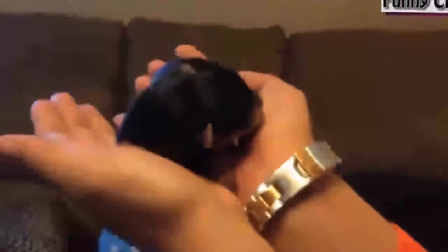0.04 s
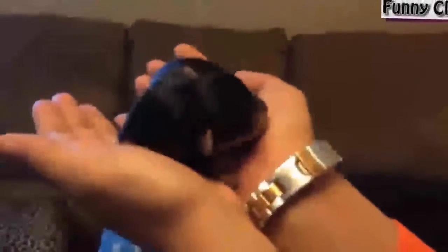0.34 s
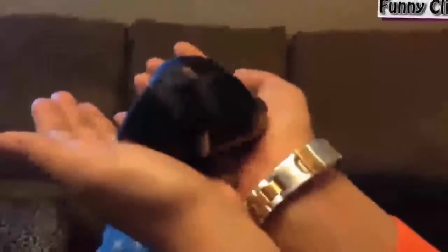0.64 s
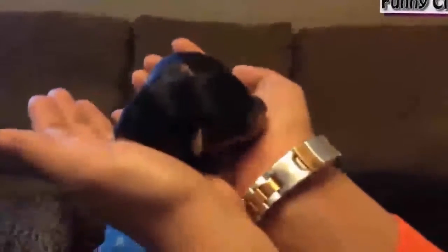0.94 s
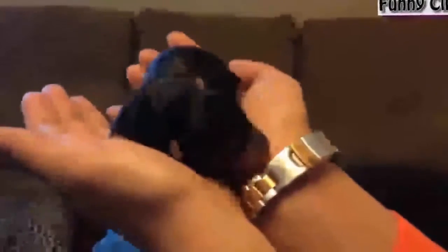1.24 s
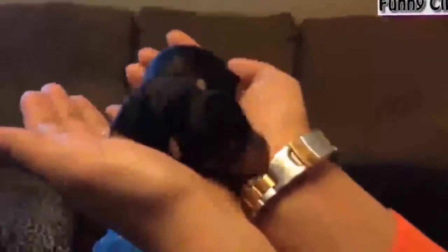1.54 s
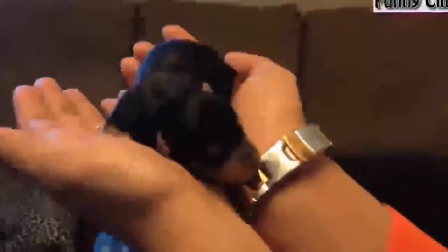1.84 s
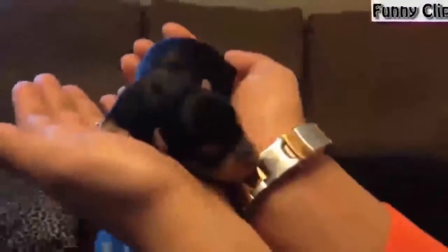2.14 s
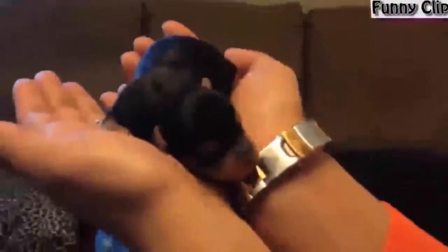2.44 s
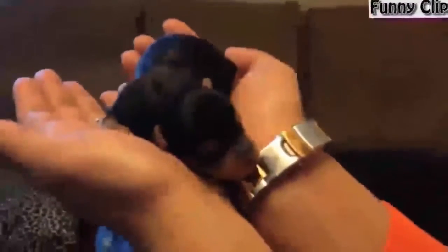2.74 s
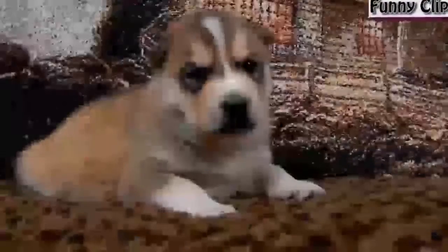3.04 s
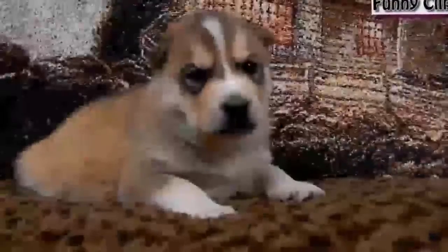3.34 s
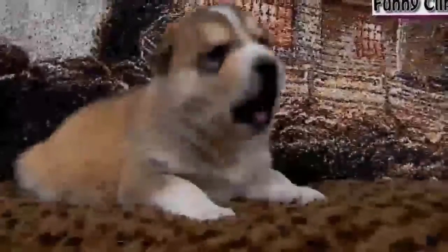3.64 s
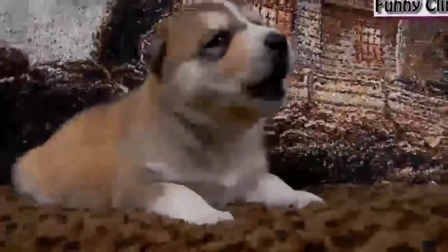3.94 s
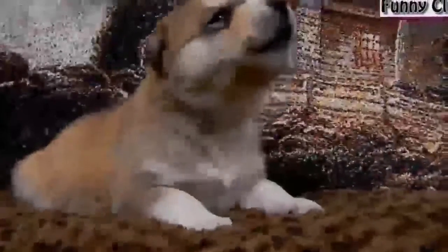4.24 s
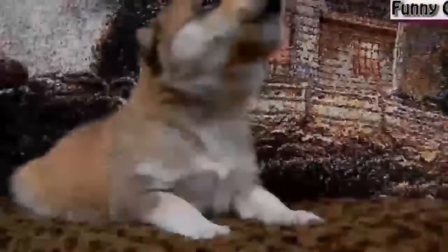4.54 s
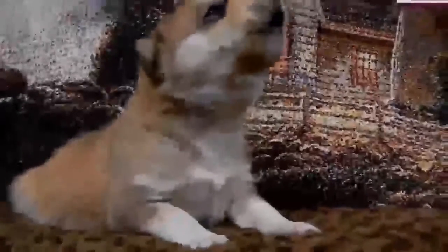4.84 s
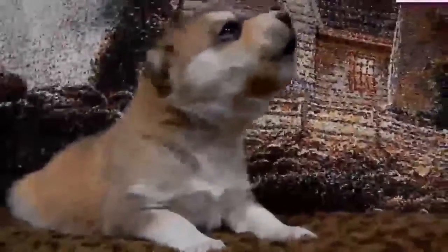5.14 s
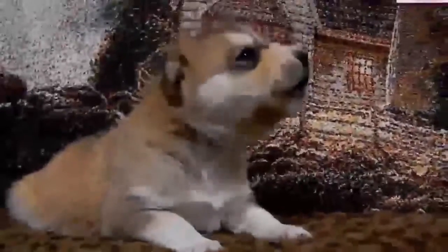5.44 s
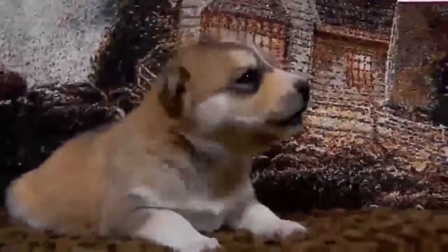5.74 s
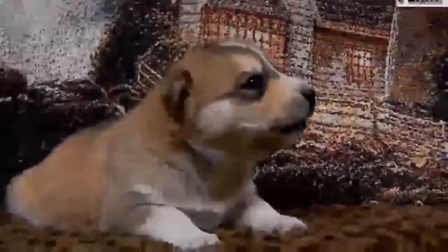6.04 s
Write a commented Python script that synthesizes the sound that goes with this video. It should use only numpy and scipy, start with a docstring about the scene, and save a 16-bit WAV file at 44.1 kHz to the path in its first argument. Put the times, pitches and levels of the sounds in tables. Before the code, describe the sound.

A newborn puppy whimpers twice, then an older pup yelps, gasps and gives a long trembling, falling howl over room hum.

```python
"""Soft hiss, and over it a newborn puppy, held in the hands, whimpers twice. After a moment of silence
an older pup, close by in a second, humming room, yelps, gasps with a rattle, holds a long trembling
howl that sinks away, and starts a lower moan. Each cry follows the source-filter principle: vibrating
vocal folds supply harmonics and breath noise, and the resonances of throat and mouth shape them.
Walls add reverberation, fans and motors hum, and a hand softly bumps the microphone."""
import sys
import numpy as np
from scipy import signal
from scipy.fft import rfft, irfft
from scipy.io import wavfile
from scipy.ndimage import uniform_filter1d

SR = 44100
rng = np.random.default_rng(int(sys.argv[2]) if len(sys.argv) > 2 else 0)


def pcm_store(signal):
    """Save signal as 16-bit PCM."""
    levels = np.round(np.clip(np.atleast_2d(signal), -1, 1) * 32767)
    wavfile.write(sys.argv[1], SR, levels.astype(np.int16).T)


N = 277389
TIME = np.arange(N) / SR
BINS = np.fft.rfftfreq(N, 1 / SR)

# Vocal tract response with the head lowered and the mouth nearly shut.
# Each row: frequency in Hz, relative gain in dB.
CLOSED_THROAT = [(500, 6), (1250, 38.5), (2050, 27), (2650, 12.5), (3000, 29), (3400, 16.5), (3700, -13),
                 (4200, 9.5), (5700, 1), (6300, 7.5), (9000, -3), (15500, -24)]


def older_pup():
    """Posture sets the tract's resonances: muzzle raised for yelp and howl, head lowered for the moan."""
    # Each row: time in seconds, pitch in Hz, relative level in dB, relative treble level in dB.
    yelp = [(3.72, 1246, -34, -37), (3.73, 1161, -27, -36.5), (3.772, 1397, -13.5, -16.5),
            (3.804, 1413, -16.5, -16), (3.82, 1443, -13.5, -10.5), (3.828, 1502, -8, -20),
            (3.852, 1454, -15.5, -15), (3.876, 1304, -18.5, -42), (3.904, 1235, -26, -44),
            (3.91, 1180, -31, -40)]
    howl = [(4.1, 918, -31, -46.5), (4.144, 1155, -23, -29), (4.174, 1230, -26.5, -35.5),
            (4.294, 1026, -17.5, -44.5), (4.476, 1075, -19.5, -38.5), (4.572, 1058, -16.5, -38),
            (4.71, 963.7, -20, -40.5), (4.906, 897.4, -22, -46), (5.322, 835, -25.5, -46),
            (5.414, 801.4, -26.5, -47.5), (5.468, 730.3, -27, -53.5), (5.542, 560.6, -26.5, -52),
            (5.61, 487, -28.5, -53), (5.69, 331, -25.5, -59)]
    # Each row: time in seconds, pitch in Hz, relative level in dB.
    moan = [(5.82, 191, -46), (5.872, 284.2, -27.5), (5.908, 396.7, -21), (5.93, 464.5, -23),
            (5.956, 666.6, -19), (5.984, 670.3, -18.5), (6.172, 487, -23.5), (6.206, 473.6, -24.5),
            (6.29, 374.3, -22)]
    # Resonances of the mouth and the open throat. Each row: frequency in Hz, relative gain in dB.
    yelp_mouth = [(1170, -11), (1400, 5.5), (2450, -11.5), (2800, -11), (3000, -8), (3500, -30),
                  (3950, -30), (4200, -11), (4500, -11.5)]
    howl_mouth = [(350, -4), (700, -9.5), (850, -5.5), (960, -4.5), (1060, -1), (1200, -7), (1550, -10.5),
                  (2150, -18.5), (2450, -6.5), (2600, -5.5), (2860, 9), (3150, -10), (3700, 7.5)]
    moan_mouth = [(330, -2), (600, -4), (680, -3.5), (900, 0), (1120, -2), (1340, -0.5), (1550, -14),
                  (2000, -23)]
    open_throat = [(500, -4), (1250, 32), (1750, 27.5), (2300, 14.5), (2950, 25.5), (3700, -6.5),
                   (4300, -2.5), (5000, 4.5), (5600, 11), (6500, 7.5), (7300, -5), (8000, -3.5),
                   (9800, -14), (11000, -11.5), (15500, -34)]
    # Direction cues. Each row: frequency in Hz, left minus right level in dB, left lead in radians.
    direction = [(400, -3.5, 1.16), (920, -4, 1.21), (1400, -2.5, 1.05), (2000, -1, 1.02), (2900, 1, 1.16),
                 (4170, 6, 0.69), (5500, 3.5, -0.96), (8000, 1.5, -0.091)]
    dry = cry(yelp, yelp_mouth, open_throat, direction, gain_db=0.5, treble_db=-2, breath_db=-18.5,
              tremor_hz=28.2, tremor_depth=0.00063, tired_db=-1,
              jitter=0.005, shimmer=0.083, fray=0.061, edge_s=0.0024)
    dry += cry(howl, howl_mouth, open_throat, direction, gain_db=2.67, treble_db=-3, breath_db=-20,
               tremor_hz=27.82, tremor_depth=0.026, tired_db=11.5,
               jitter=0.00754, shimmer=0.049, fray=0.027, edge_s=0.0054, third_db_per_khz=-38.5)
    dry += cry(moan, moan_mouth, CLOSED_THROAT, direction, gain_db=0.5, treble_db=-32, breath_db=-10,
               tremor_hz=25.9, tremor_depth=0.021, tired_db=12.5,
               jitter=0.0103, shimmer=0.073, fray=0.067, edge_s=0.0045)
    dry += gasp()
    return dry + reverberation(dry, t60=0.38, wet_db=-7, damp_hz=7440)


def newborn():
    """Two thin cries end in glottal closure; absorption by a sofa keeps the reverberation short."""
    # Each row: time in seconds, pitch in Hz, relative level in dB.
    whimper = [(1.02, 1052, -41), (1.038, 1076, -30.5), (1.07, 1068, -30), (1.102, 948, -31.5),
               (1.114, 942, -27.5), (1.18, 830.8, -36.5), (1.27, 766, -33.5), (1.3, 795, -31),
               (1.32, 713, -40.5)]
    squeak = [(2.72, 1080, -30.5), (2.73, 930.5, -20.5), (2.756, 932, -19.5), (2.792, 902, -19.5),
              (2.8, 881, -21.5), (2.816, 693, -28.5), (2.84, 702, -25.5), (2.866, 856, -23),
              (2.885, 880, -22)]
    # The glottis snaps shut. Each row: start in seconds, initial level in dB.
    catches = [(1.315, -63), (2.88, -29), (2.925, -36)]
    # Mouth resonances and the spectrum of a catch. Each row: frequency in Hz, relative gain in dB.
    mouth = [(700, -6.5), (770, -3.5), (830, -3.5), (930, 5.5), (1060, 2), (1400, 5.5), (1550, -5),
             (1700, -8.5), (1860, -10.5), (2090, -4.5), (2300, -33), (2800, -45)]
    catch_spectrum = [(300, 2), (650, 12.5), (1300, 14.5), (2000, 1), (3300, -11), (6000, -37)]
    ahead = [(1, 0.0064, 0)]  # left and right nearly equal and in phase at every frequency
    dry = cry(whimper, mouth, CLOSED_THROAT, ahead, gain_db=0, treble_db=-59, breath_db=-6,
              tremor_hz=38.2, tremor_depth=0.006, tired_db=2.5,
              jitter=0.007, shimmer=0.088, fray=0.087, edge_s=0.0026, second_db=3.5)
    dry += cry(squeak, mouth, CLOSED_THROAT, ahead, gain_db=0.5, treble_db=-49, breath_db=-7.5,
               tremor_hz=40, tremor_depth=0.0019, tired_db=3,
               jitter=0.0055, shimmer=0.031, fray=0.03, edge_s=0.0017, second_db=-5)
    dry += sum(undb(db) * puff(start, catch_spectrum, decay_s=0.022) for start, db in catches)
    return dry + reverberation(dry, t60=0.084, wet_db=-4.5, damp_hz=4020)[0]


def cry(contour, mouth, throat, direction, gain_db, treble_db, breath_db, tremor_hz, tremor_depth,
        tired_db, jitter, shimmer, fray, edge_s, second_db=0, third_db_per_khz=0):
    """Source and filter: the mouth shapes the folds' three lowest harmonics, the throat all the rest."""
    on = (TIME >= contour[0][0]) & (TIME <= contour[-1][0])
    t = TIME[on]
    note, *levels = curves(contour, t)
    level_db = levels[0]
    ring_db = levels[-1] + treble_db  # without a curve of its own the treble follows the level
    tremor, rasp_db = larynx(on, tremor_hz, tremor_depth, tired_db)
    pitch = note * (1 + tremor + jitter * undb(rasp_db / 2) * waver(174)[on])
    # Each cycle closes a little early or late, which frays the high harmonics most.
    phase = 2 * np.pi * np.cumsum(pitch) / SR + fray * undb(rasp_db) * waver(490)[on]
    harmonic = np.arange(1, 31)[:, None]
    hz = harmonic * pitch

    amplitude = undb(ring_db) * throat_gains(harmonic, hz, throat)
    amplitude *= 1 + 12 * tremor  # the ring flutters with the pitch
    flutter_share = 0.46  # part of the quaver that the mouth turns into loudness
    fluttering = mouth_gains(note + flutter_share * (pitch - note), mouth, second_db, third_db_per_khz)
    steady = mouth_gains(note, mouth, second_db, third_db_per_khz)
    amplitude[:3] = undb(level_db) * fluttering / np.linalg.norm(steady, axis=0)

    pan_db, lead = at_frequency(direction, hz), at_frequency(direction, hz, column=2)
    folds = np.array([np.sum(amplitude * undb(side * pan_db) * np.sin(harmonic * phase + side * lead), 0)
                      for side in (0.5, -0.5)])
    # Rasp makes the cycles uneven, then alternately strong and weak, and lets more air through.
    folds *= 1 + shimmer * undb(rasp_db) * waver(200)[on]
    subharmonic_depth = np.minimum(0.45 * shimmer * undb(2 * rasp_db), 0.5)
    folds *= 1 + subharmonic_depth * np.cos(phase / 2 + waver(90)[on])
    airflow = undb(breath_db + rasp_db) * np.sqrt(undb(ring_db) * np.linalg.norm(amplitude, axis=0))
    voice = np.sqrt(2) * folds + airflow * aspiration(on, phase, throat)
    out = np.zeros((2, N))
    out[:, on] = voice * undb(gain_db) * gate(t, t[0], t[-1], edge_s)
    return out


def larynx(on, tremor_hz, tremor_depth, tired_db):
    """Tremor modulates the pitch, most in mid-cry; the folds rasp at a crack and as the air runs out."""
    # Cracks of the voice. Each row: centre in seconds, half-width in seconds, extra rasp in dB.
    cracks = [(1.11, 0.053, 4.5), (3.724, 0.019, 12), (3.81, 0.0081, 6.5), (4.142, 0.052, 13.5)]
    fresh_rasp_db, slowing_hz_per_s = -2.5, 3.41
    t = TIME[on]
    age = t - t[0]
    progress = age / age[-1]
    rasp_db = fresh_rasp_db + tired_db * progress ** 2.4  # the folds tire late in the cry
    rasp_db += sum(db * np.exp(-((t - centre) / width) ** 2) for centre, width, db in cracks)
    rate_hz = tremor_hz - slowing_hz_per_s * age
    depth = tremor_depth * np.abs(np.sin(np.pi * progress)) ** 0.42  # sets in early and lasts
    depth *= 1 + 0.25 * waver(12)[on]  # no two quavers are equally deep or equally long
    phase = 2 * np.pi * np.cumsum(rate_hz) / SR + 0.4 * waver(10)[on]
    return depth * np.cos(phase), rasp_db


def mouth_gains(pitch, mouth, second_db, third_db_per_khz):
    """Mouth resonances weight the three lowest harmonics; the third can fade as the folds tighten."""
    slack_hz = 408  # below this pitch the third harmonic is at full strength
    tightness_khz = np.maximum(pitch - slack_hz, 0) / 1000
    source_db = [0, second_db, third_db_per_khz * tightness_khz]
    return np.array([undb(db + at_frequency(mouth, k * pitch)) for k, db in enumerate(source_db, 1)])


def throat_gains(harmonic, hz, throat):
    """Harmonics swell as they sweep across a resonance; the treble's short-term power is held near 1."""
    below_nyquist = np.clip((SR * 0.4 - hz) / 1000, 0, 1)
    gains = undb(at_frequency(throat, hz)) * below_nyquist
    treble_weight = np.clip((hz - 3500) / 600, 0, 1) * (harmonic > 3)
    treble_power = np.sum((gains * treble_weight) ** 2, axis=0)
    return gains / np.sqrt(uniform_filter1d(treble_power, SR // 30))


def aspiration(on, phase, throat):
    """Turbulence: air leaks through the folds once a cycle, as bright noise filtered by the throat."""
    bright_tilt = BINS ** 2 / (BINS ** 2 + 900 ** 2) * (1 + BINS / 7000)
    hiss = unit(noise(undb(at_frequency(throat, BINS)) * bright_tilt))
    return hiss[on] * (1 + np.cos(phase))


def gasp():
    """Impulse excitation: a gulp of air slaps the throat, and each slap rings the damped chest."""
    # Each row: start in seconds, relative slap level in dB, relative chest level in dB.
    slaps = [(3.981, -9.5, -25), (3.992, -15, -22), (4, -8, -24), (4.008, -6, -39), (4.02, -6.5, -22),
             (4.024, -41, -27)]
    # Spectrum of a slap. Each row: frequency in Hz, relative gain in dB.
    slap_spectrum = [(240, -26), (400, -9), (630, -9.5), (712, -9.5), (1230, 2.5), (3100, -16),
                     (3610, -4.5), (4530, -41), (6320, -25), (8180, -26), (12300, -29.5), (14300, -50),
                     (15000, -36)]
    chest_hz, chest_decay_s = 190, 0.0026
    out = np.zeros(N)
    for start, slap_db, chest_db in slaps:
        age = np.maximum(TIME - start, 0)
        out += undb(slap_db - 8) * puff(start, slap_spectrum, decay_s=0.004)
        out += undb(chest_db + 9.5) * np.sin(2 * np.pi * chest_hz * age) * np.exp(-age / chest_decay_s)
    return out


def puff(start, spectrum, decay_s):
    """A sudden burst of air through the throat gives filtered noise with an exponential decay."""
    age = np.maximum(TIME - start, 0)
    return unit(noise(undb(at_frequency(spectrum, BINS)))) * np.exp(-age / decay_s) * (age > 0)


def reverberation(x, t60, wet_db, damp_hz):
    """Diffuse reflections in a small furnished room decay exponentially, duller than their source."""
    t = TIME[:SR // 2]
    tail = rng.standard_normal(len(t)) + 0.5 * rng.standard_normal((2, len(t)))  # sides much alike
    tail *= undb(-60 * t / t60) * (t > 0.0015)
    tail /= np.sqrt(np.sum(tail ** 2, axis=1, keepdims=True))
    tail = signal.sosfilt(signal.butter(1, damp_hz, fs=SR, output="sos"), tail)
    return undb(wet_db) * signal.fftconvolve(x, tail, axes=1)[:, :N]


def room_air():
    """Ambient noise: each room in turn has its own spectrum and its own left-right correlation."""
    # Each row: frequency in Hz, relative spectral density in dB.
    first_spectrum = [(12, -12), (20, 4), (59, -6), (133, -8.5), (181, -11.5), (215, -11), (345, -14),
                      (693, -17), (819, -17.5), (1180, -20), (1430, -21), (11000, -35), (14500, -34),
                      (15800, -36.5)]
    second_spectrum = [(12, -69), (20, -38), (37, -10.5), (123, -1), (240, -6), (335, -9), (375, -5.5),
                       (843, -26), (1050, -22.5), (1650, -27.5), (2370, -31), (2650, -32), (6470, -39.5),
                       (10700, -41), (15800, -47.5)]
    # Each row: frequency in Hz, correlation between left and right.
    first_coherence = [(60, 0.64), (120, 0.37), (400, 0.62), (2400, 0.74), (4400, 0.36), (15000, .05)]
    second_coherence = [(60, 0.85), (130, 1), (290, 0.71), (640, -0.86), (1410, -0.77), (3100, -0.67),
                        (6820, -0.33), (15000, 0.54)]
    first_end_s, second_start_s = 3.118, 3.176
    first = stereo_noise(first_spectrum, first_coherence, level_db=-43.5, flicker_db=1.05)
    second = stereo_noise(second_spectrum, second_coherence, level_db=-36.5, flicker_db=-0.53)
    return first * gate(TIME, -1, first_end_s, 0.0089) + second * gate(TIME, second_start_s, 10, 0.002)


def stereo_noise(spectrum, coherence, level_db, flicker_db):
    """Partial coherence: one noise is shared by both sides, another enters them in opposite phase."""
    gain = undb(at_frequency(spectrum, BINS))
    correlation = np.clip(at_frequency(coherence, BINS), -0.9, 0.97)
    mid = noise(gain)
    side = noise(gain * np.sqrt((1 - correlation) / (1 + correlation)))
    return np.array([mid + side, mid - side]) / np.std(mid) * undb(level_db + flicker_db * waver(6))


def motor_hum():
    """Rotating fans and motors radiate low tones that wander slightly in frequency."""
    # Each row: start in seconds, end in seconds, frequency in Hz, rms level in dB.
    tones = [(0, 1.05, 134.7, -49.5), (0, 3.12, 107.7, -54.5), (3.17, 6.3, 120, -42.5),
             (3.171, 5.4, 177, -46), (3.172, 6.3, 233, -52), (3.17, 6.3, 371, -48)]
    wander_hz = 2.462
    out = np.zeros(N)
    for start, end, hz, db in tones:
        phase = 2 * np.pi * np.cumsum(hz + wander_hz * waver(5.05)) / SR
        out += np.sqrt(2) * undb(db) * np.sin(phase) * gate(TIME, start, end, 0.022)
    return out


def hand_bumps():
    """Structure-borne sound: each touch of the hand gives the microphone one slow swing."""
    # Each row: centre in seconds, envelope peak in dB.
    bumps = [(0.311, -25), (.41, -24), (2.111, -25.5), (2.2, -25)]
    swing_hz, half_width_s = 16.7, 0.029
    out = np.zeros(N)
    for centre, db in bumps:
        t = TIME - centre
        out += undb(db) * np.exp(-(t / half_width_s) ** 2) * np.sin(2 * np.pi * swing_hz * t)
    return out


def undb(db):
    """Decibels to amplitude ratio."""
    return 10 ** (np.asarray(db) / 20)


def unit(x):
    """Normalisation to rms 1."""
    return x / np.sqrt(np.mean(x ** 2))


def curves(rows, t):
    """Linear interpolation in time of a table's columns."""
    times, *columns = np.transpose(rows)
    return [np.interp(t, times, column) for column in columns]


def at_frequency(rows, hz, column=1):
    """Interpolation of one column on a logarithmic frequency axis."""
    rows = np.array(rows, float)
    return np.interp(np.log(np.maximum(hz, 1)), np.log(rows[:, 0]), rows[:, column])


def noise(gain):
    """Spectral shaping: white noise with a given gain in each frequency bin."""
    return irfft(rfft(rng.standard_normal(N)) * gain, N)


def waver(rate_hz):
    """Random modulation: noise low-passed at the given rate, with rms 1."""
    return unit(noise(1 / (1 + (BINS / rate_hz) ** 4)))


def gate(t, start, end, edge_s):
    """A trapezoidal window from start to end."""
    return np.clip((t - start) / edge_s, 0, 1) * np.clip((end - t) / edge_s, 0, 1)


def scene():
    """Superposition of both puppies and the background of their rooms."""
    return newborn() + older_pup() + room_air() + motor_hum() + hand_bumps()


def record(dry):
    """Soft saturation rounds the loudest peaks, and a steep low-pass filter cuts the top."""
    ceiling, cutoff_hz = 0.9, 15750
    rounded = dry / (1 + (dry / ceiling) ** 6) ** (1 / 6)
    return signal.sosfilt(signal.ellip(10, 0.2, 80, cutoff_hz, fs=SR, output="sos"), rounded)


dry = scene()
out = record(dry)
pcm_store(out)
```